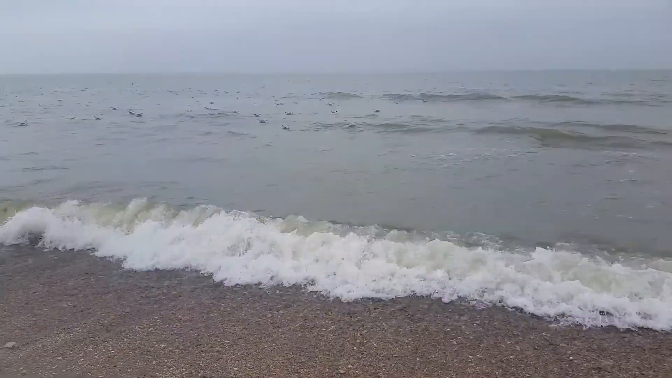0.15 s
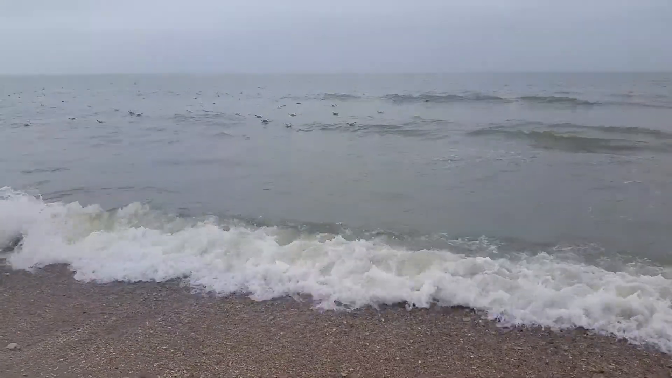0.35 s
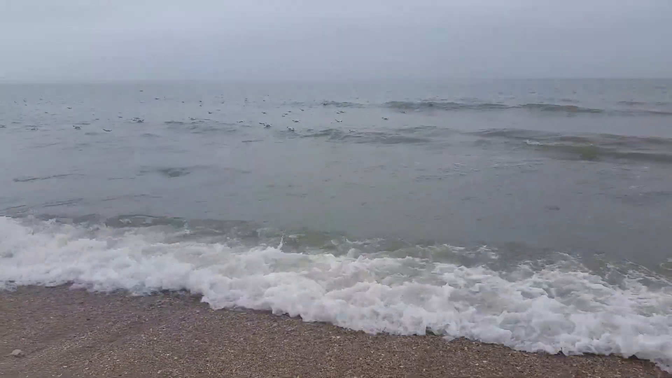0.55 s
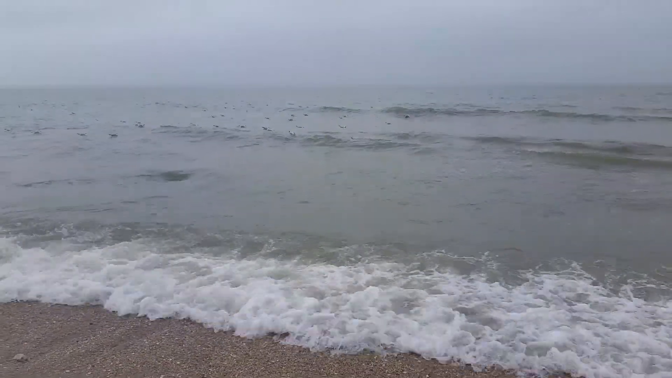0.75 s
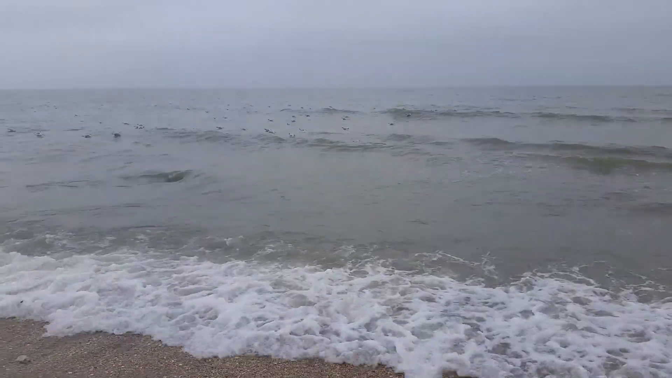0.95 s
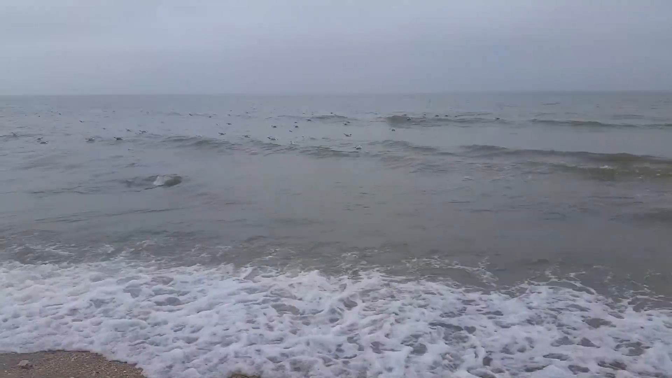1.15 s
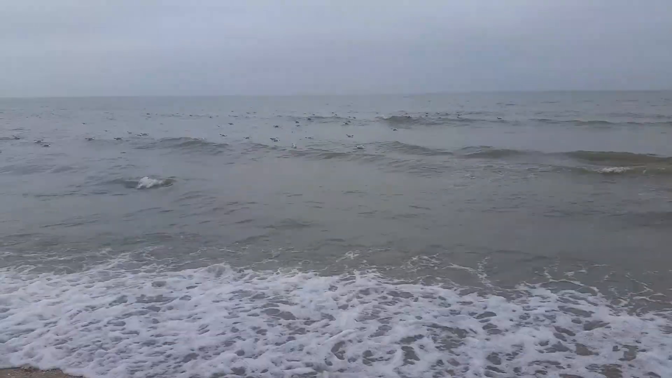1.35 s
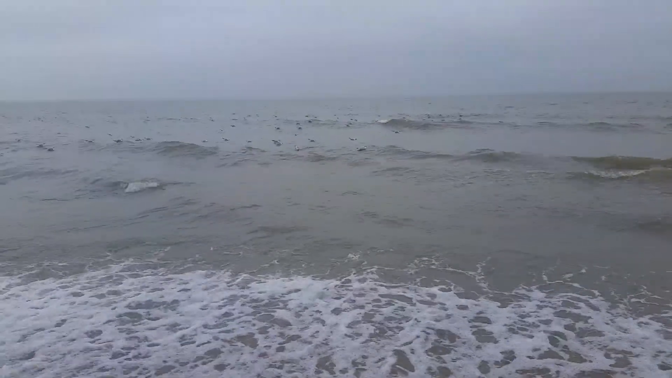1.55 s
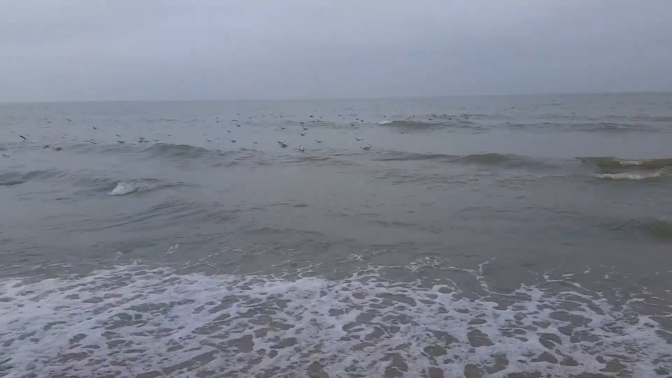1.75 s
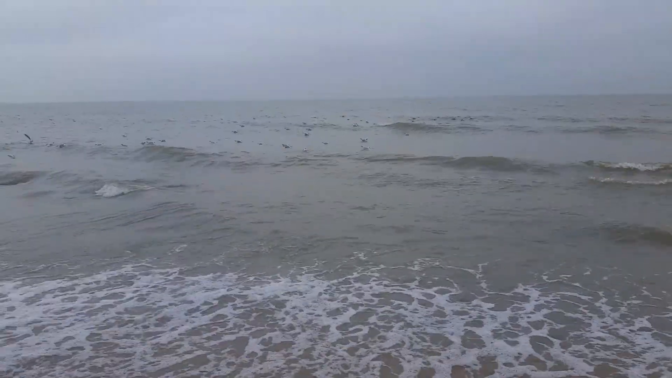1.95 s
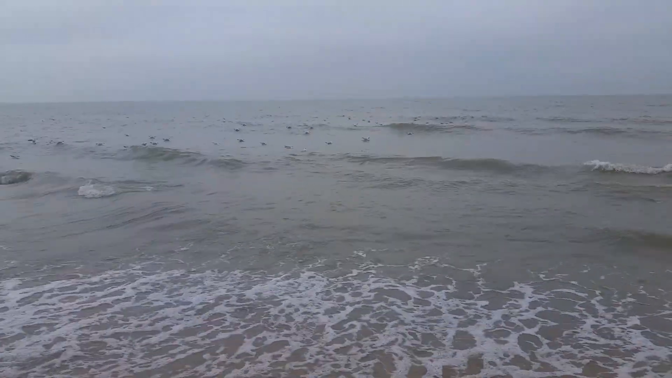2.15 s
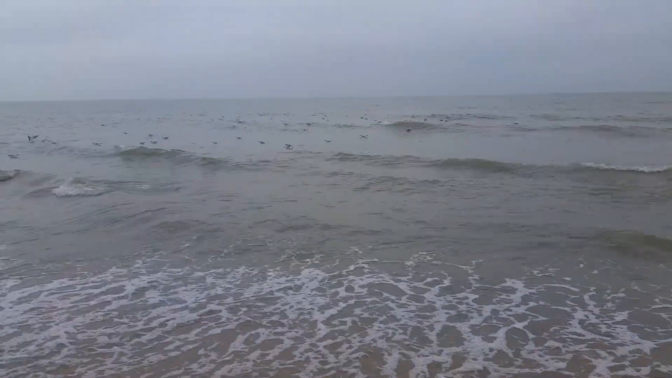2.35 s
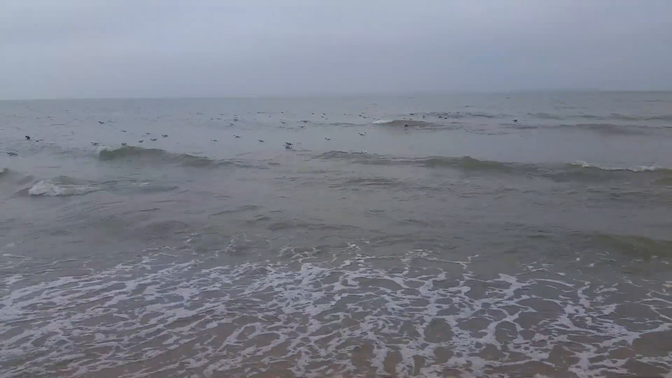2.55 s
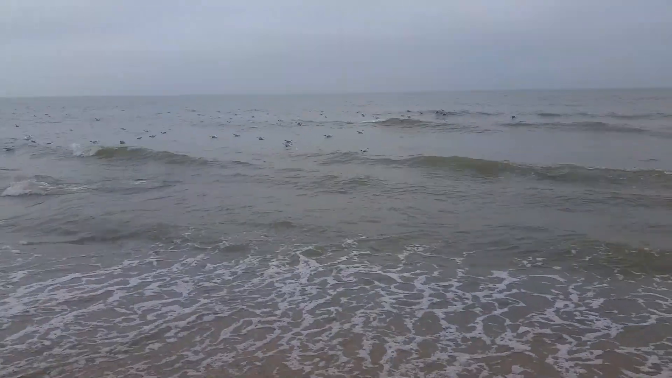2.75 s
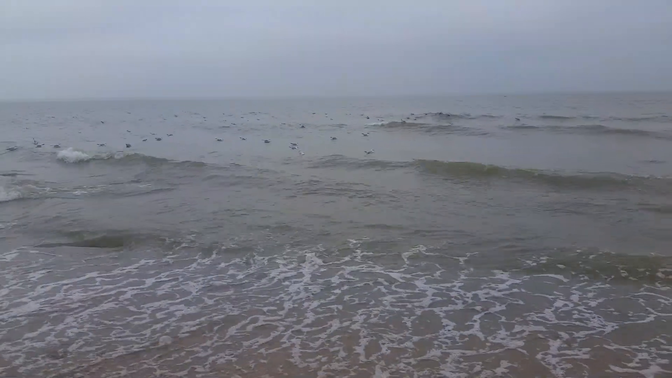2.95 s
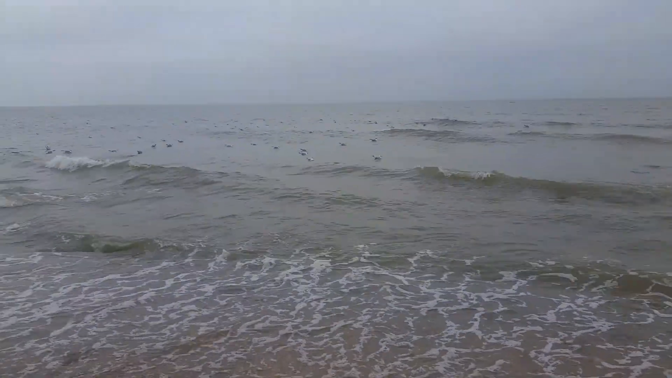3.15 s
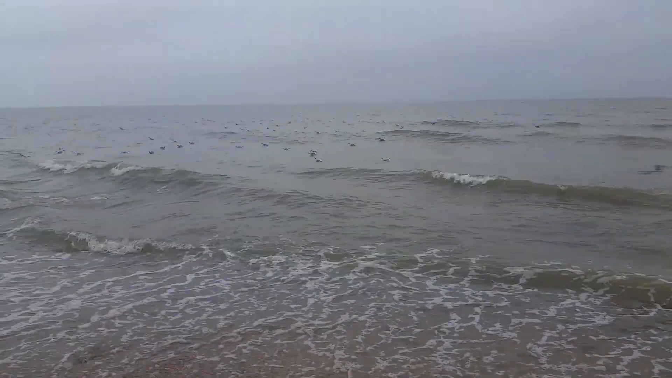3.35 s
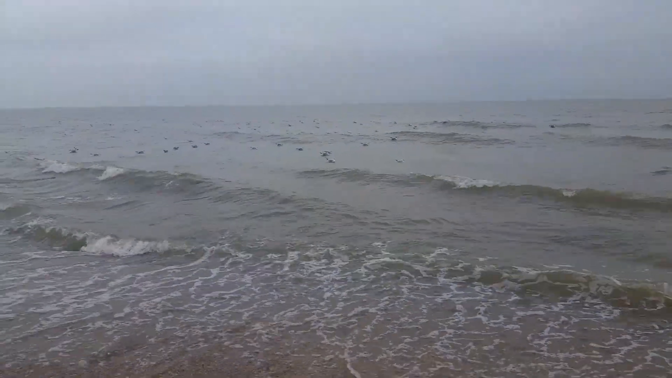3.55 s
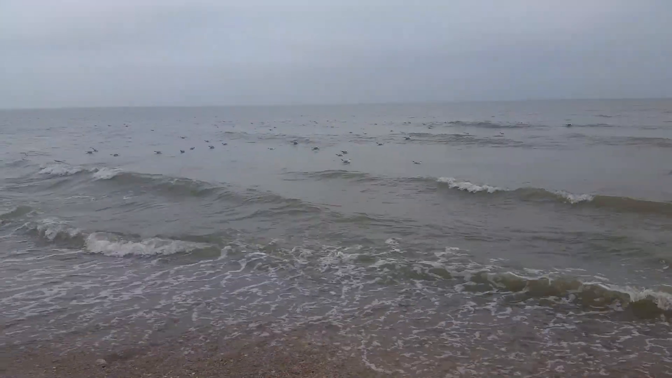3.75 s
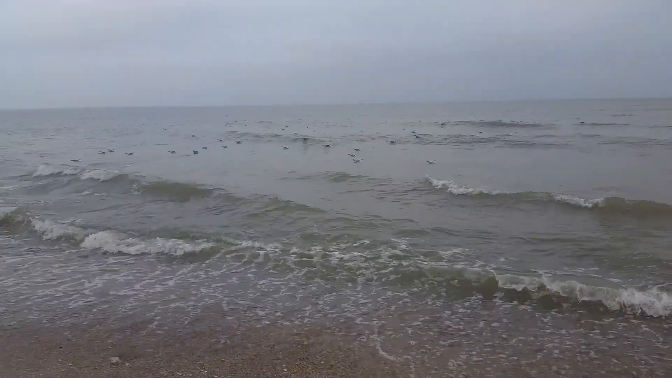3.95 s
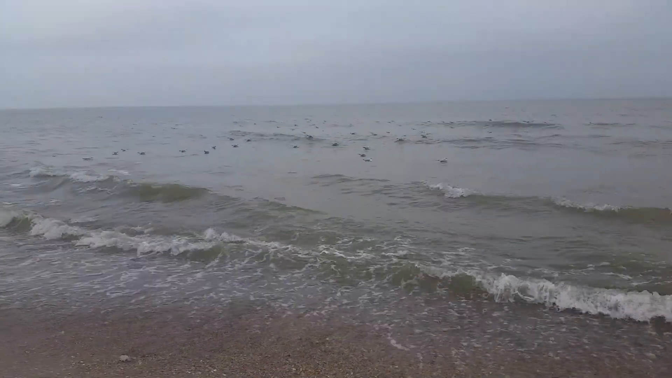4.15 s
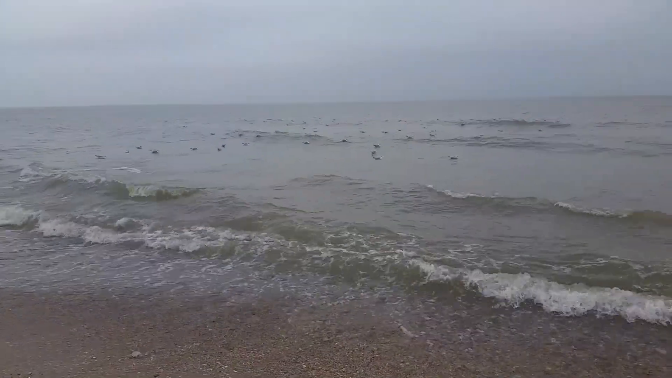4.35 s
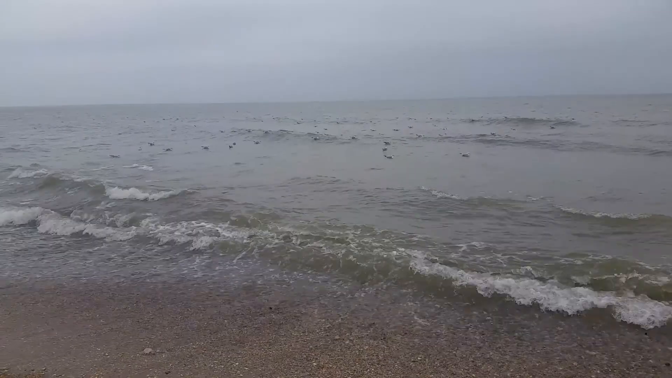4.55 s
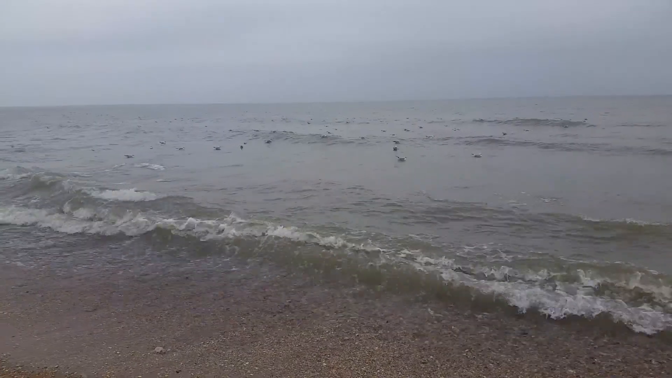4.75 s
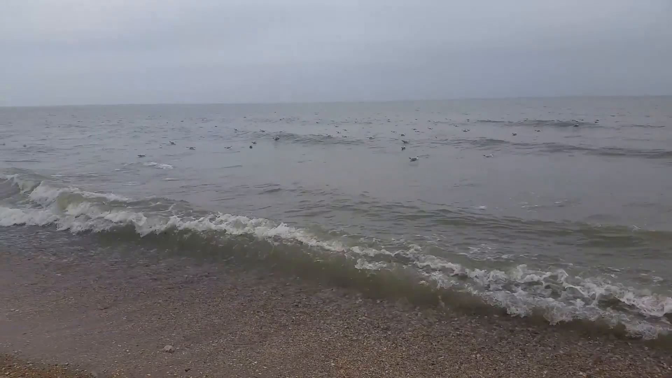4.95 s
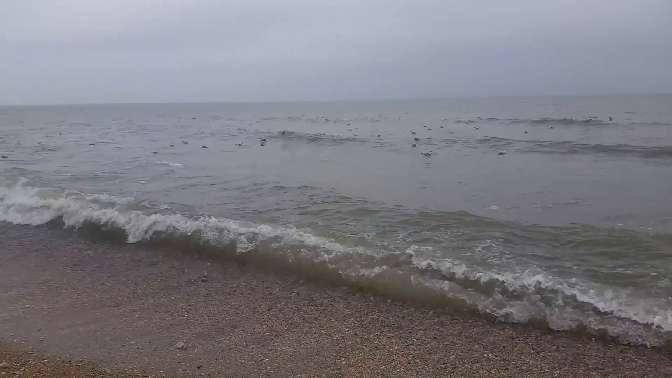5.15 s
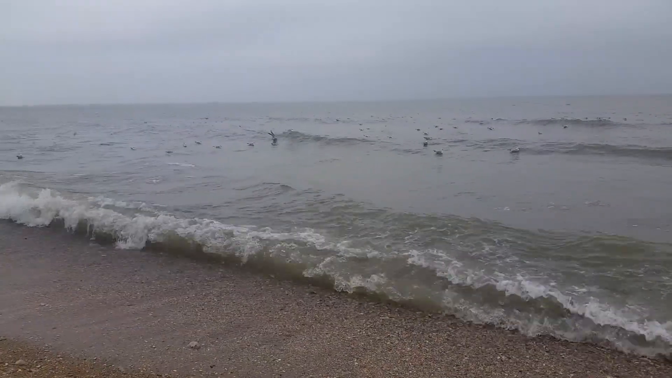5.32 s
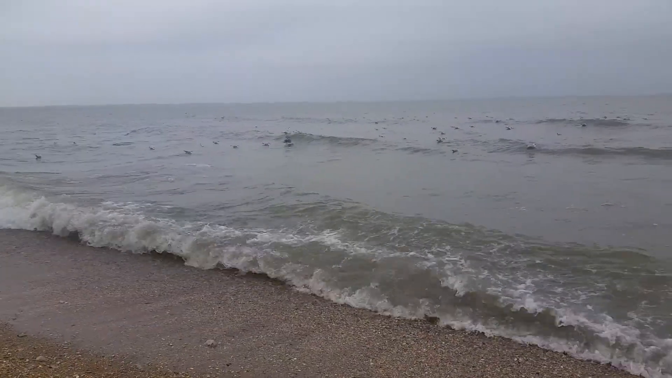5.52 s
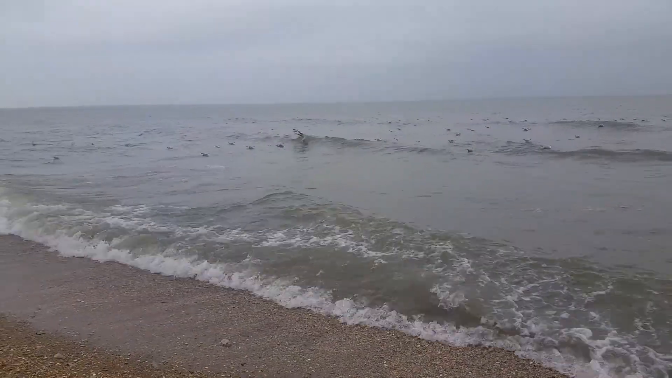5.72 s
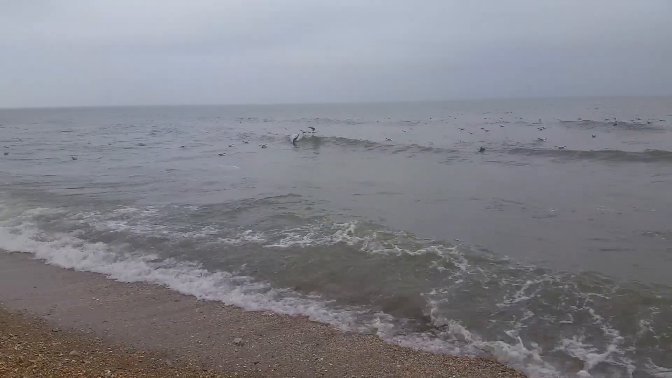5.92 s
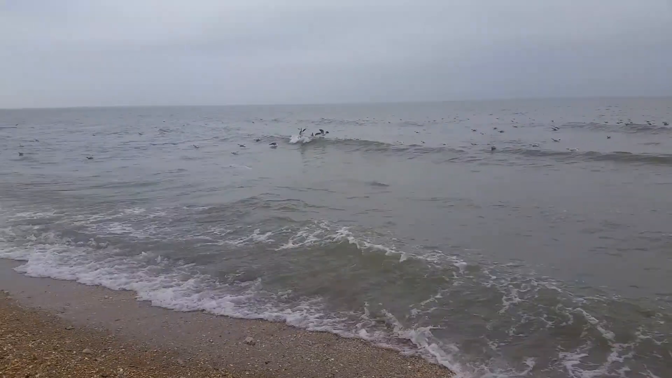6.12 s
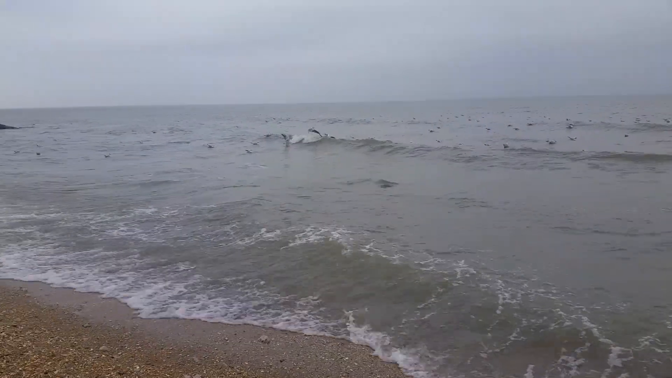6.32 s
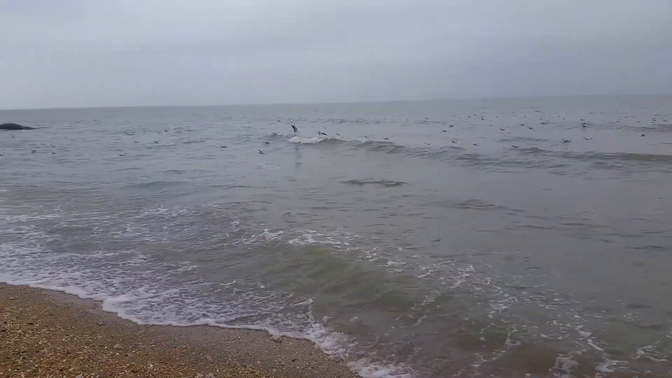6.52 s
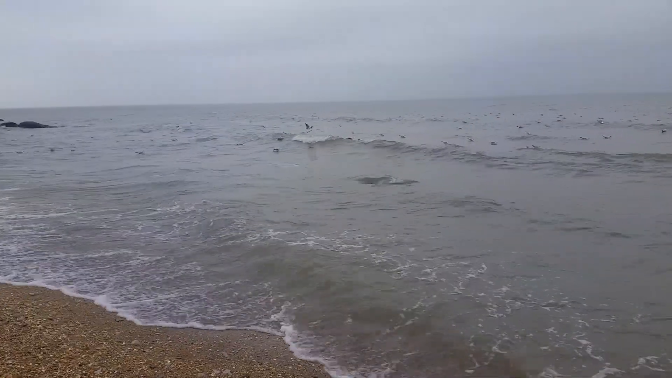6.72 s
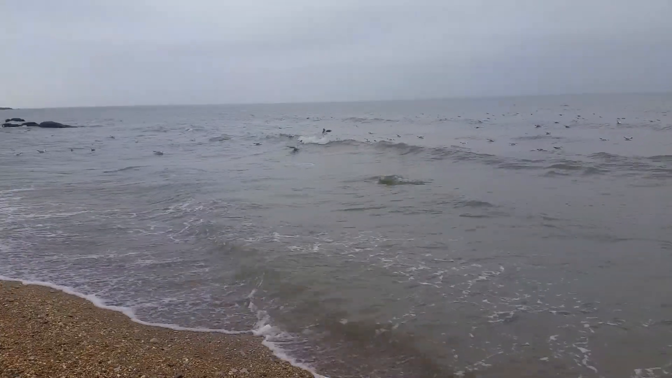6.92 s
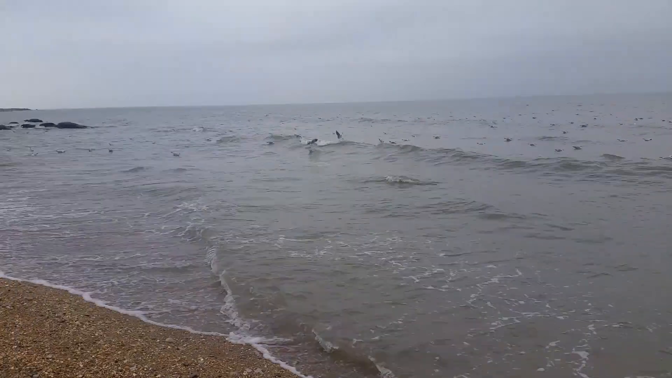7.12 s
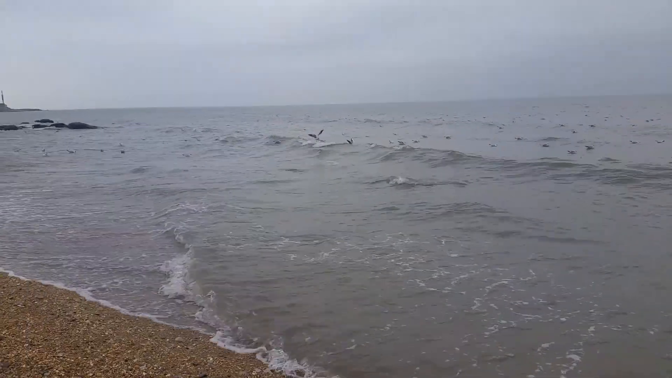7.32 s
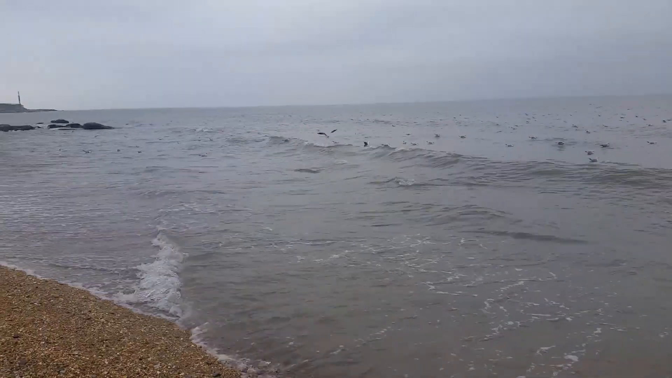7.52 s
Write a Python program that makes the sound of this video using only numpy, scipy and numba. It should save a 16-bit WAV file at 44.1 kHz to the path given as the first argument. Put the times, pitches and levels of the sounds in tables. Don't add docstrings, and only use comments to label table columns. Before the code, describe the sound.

A small wave is already crashing at the start, with roar, watery wash, shell rattle and fizzing foam, plus a few bubbly plops. It fades to a softer sea, then smaller surges build to another strong break. Wind thumps grow heavy late. Handheld stereo microphone a few metres away outdoors, right side brighter, left side duller.

```python
import sys
import numpy as np
from scipy import signal
from scipy.fft import rfft, irfft, next_fast_len
from scipy.io import wavfile
from scipy.ndimage import uniform_filter1d, minimum_filter1d
from numba import njit

SR = 44100
rng = np.random.default_rng(int(sys.argv[2]) if len(sys.argv) > 2 else 0)


def magnitude_from_level(level_db):
    exponent = np.asarray(level_db, float) / 20
    return 10 ** exponent


def master_out(mix):
    frames = np.transpose(np.atleast_2d(mix))
    ceiling = np.clip(frames, -1, 1)
    pcm = np.round(ceiling * 32767).astype(np.int16)
    wavfile.write(sys.argv[1], SR, pcm)


N = 334278
LAG_S = 0.00042


def noise():
    return rng.standard_normal(N)


def unit(x):
    return x / np.sqrt(np.mean(x ** 2))


def over_time(table):
    s, *columns = np.transpose(table)
    return np.array([np.interp(np.arange(N) / SR, s, c) for c in columns])


def over_hz(hz, points, values):
    return np.interp(np.log(hz), np.log(points), values)


def walk(rate):
    hold = int(SR / rate)
    held = np.repeat(rng.standard_normal(N // 64), hold)[:N]
    slewed = uniform_filter1d(held, hold)
    return unit(uniform_filter1d(slewed, hold))


@njit
def rings(start, hz, cycles, size, glide):
    out = np.zeros(N)
    for c, f, n, a in zip(start, hz, cycles, size):
        phase, step = 0., 2 * np.pi * f / SR
        length = int(n * SR / f)
        for i in range(min(length, N - int(c))):
            phase += step * (1 + glide * i / length)
            out[int(c) + i] += a * np.sin(phase) * np.exp(-5 * i / length)
    return out


@njit
def bumps(start, width, size):
    out = np.zeros(N)
    for c, w, a in zip(start, width, size):
        for i in range(max(0, int(c - 6 * w)), min(N, int(c + 6 * w))):
            out[i] += a / (1 + ((i - c) / w) ** 2) ** 2
    return out


def bubbles(per_s, low_hz, high_hz, cycles, scatter_db):
    when, pitch, luck = rng.random((40000, 3))[:int(per_s * N / SR)].T
    hz = low_hz * (high_hz / low_hz) ** pitch
    louder_db = scatter_db * np.minimum(-np.log(1 - luck), 4)
    return unit(rings(when * N, hz, cycles + 0 * hz, hz ** 1.6 * magnitude_from_level(louder_db), 0.3))


def water():
    clumps = magnitude_from_level(1.4 * walk(16)) * bubbles(1500, 307, 5240, cycles=7.5, scatter_db=1.8)
    foam = magnitude_from_level(2.4 * walk(9)) * bubbles(3500, 2840, 17100, cycles=3.7, scatter_db=3.2)
    return unit(noise() + magnitude_from_level(-13.0) * clumps + magnitude_from_level(-8.0) * foam)


def swell():
    # crest in seconds, strength in dB over the calm sea,
    # build-up in dB per second, extra plunge in dB, extra foam in dB.
    waves = [(0.12, 10.5, 8, -1, 0), (0.27, 6, 27, 5.5, -6), (0.52, 4.5, 28, -4, 2), (0.76, 4, 35, -6.5, 4),
             (1.7, -3, 21, 6, 0.5), (2.24, -4.5, 32, -1, -0.5), (2.95, -2, 11.5, -0.5, -3),
             (3.62, 2, 10, -4, -1.5), (3.92, -3, 33, -1.5, 0), (4.23, 3.5, 14, -4, 0.5),
             (4.5, 0, 28, -3.5, 1.5), (4.97, 6, 13.5, -5, 0), (5.34, 2.5, 11, -1.5, -0.5),
             (5.6, 3.5, 30, -5.5, 5), (5.74, 10.5, 21, -6.5, -0.5), (5.87, 4.5, 42, -1, -11),
             (6.09, 0, 42, -6, 4.5), (6.58, -4, 30, 2, 0), (6.83, 3, 16, 3, -7.5), (7.08, 2.5, 50, 2, -3.5),
             (7.37, 1, 40, -6.5, -1), (7.47, 2.5, 37, -2, 6.5)]
    far_db = np.array([-2.5, -6, -6.5, -6])
    ebb_db_s = np.array([[19], [20.5], [12.7], [17.1]])
    plunge_share = np.array([[0.92], [0.062], [0.35], [0.54]])
    foam_share = np.array([[0.0], [0.35], [0.55], [0.97]])
    power = np.ones((4, N)) * magnitude_from_level(2 * far_db)[:, None]
    for s, db, rise_db_s, plunge_db, foam_db in waves:
        late = np.arange(N) / SR - s
        crest_db = db + plunge_share * plunge_db + foam_share * foam_db
        slope_db = np.minimum(rise_db_s * late, -ebb_db_s * late)
        power = power + magnitude_from_level(2 * (crest_db + slope_db))
    return 10 * np.log10(power)


def surf():
    layer_hz = (330, 800, 4400, 10500)
    # frequency in Hz, level in dB per Hz.
    left_port = [(40, -8), (100, -0.5), (330, -3), (480, -10), (1000, -18.5), (2400, -25.5), (3650, -36),
                 (4450, -25), (5100, -31), (5600, -43), (7200, -56), (9600, -60), (12000, -55),
                 (16000, -58)]
    # frequency in Hz, level in dB per Hz.
    right_port = [(40, -6), (220, 5), (350, 1), (480, -5.5), (1000, -8), (2300, -12.5), (3000, -21.5),
                  (3650, -25.5), (4900, -22.5), (6400, -34.5), (9500, -36.5), (11300, -21.5),
                  (13000, -10.5), (16000, -13)]
    # frequency in Hz, likeness of the two ports from 0 to 1.
    likeness = [(100, 0.87), (340, 0.94), (600, 0.79), (900, 0), (1400, 0.48), (2400, 0.58), (4000, 0)]
    # frequency in Hz, left share,
    # right share.
    follow = [(320, 1, 0.99), (670, 1, 1.24), (1290, 0.99, 1.084), (2370, 0.79, 0.69), (4600, 0.15, 1.25),
              (9000, 1, 1.48), (13100, 0.24, 0.95)]
    lead_rad = 0.34
    size = next_fast_len(N)
    hz = np.maximum(np.arange(size // 2 + 1) * SR / size, 1)
    left, right = (magnitude_from_level(over_hz(hz, *np.transpose(port))) for port in (left_port, right_port))

    near, other = rfft(water(), size), rfft(water(), size)
    alike = np.clip(over_hz(hz, *np.transpose(likeness)), 0, 1)
    delay = np.exp(1j * (lead_rad - 2 * np.pi * hz * LAG_S))
    shaded = alike * near * delay + np.sqrt(1 - alike ** 2) * other
    per_hz = np.sqrt(SR / 2) * magnitude_from_level(-60.5)
    ports = per_hz * np.array([shaded * left, near * right])

    swell_db = swell()
    follow_hz, *shares = np.transpose(follow)
    sway = [walk(8.1) for _ in range(6)]
    out = np.zeros((2, N))
    for k, centre in enumerate(2 ** np.arange(5, 14.4, .5)):
        slice_ = np.cos(np.pi / 2 * np.clip(2 * np.log2(hz / centre), -1, 1)) ** 2
        weights = [over_hz(centre, layer_hz, row) for row in np.eye(4)]
        slice_db = weights @ swell_db
        flicker_db = 0.15 * sway[k // 4] + 0.74 * walk(18)
        share = np.array([[over_hz(centre, follow_hz, c)] for c in shares])
        out += magnitude_from_level(share * slice_db + flicker_db) * irfft(ports * slice_, size)[:, :N]
    return out


def plops():
    # start in seconds, peak in dB, pitch in Hz.
    large_bubbles = [(0.022, -24, 1190), (0.076, -24, 926), (0.185, -23, 647), (0.234, -27, 622),
                     (0.304, -28, 615), (0.459, -25, 610), (0.649, -30, 715), (5.141, -26, 810),
                     (5.321, -30, 730), (5.437, -28, 1050), (5.689, -18, 1030), (5.741, -21, 1030),
                     (6.933, -23, 605), (7.362, -27, 780)]
    s, db, hz = np.transpose(large_bubbles)
    ring = rings(s * SR, 1. * hz, 14 + 0 * s, magnitude_from_level(db), 0.17)
    return np.array([magnitude_from_level(-3) * np.roll(ring, int(LAG_S * SR)), magnitude_from_level(8.0) * ring])


def capsule(pressure, hz, sharpness):
    w = 2 * np.pi * hz
    return signal.lfilter(*signal.bilinear([1, 0, 0], [1, w / sharpness, w * w], SR), pressure)


def gusts(level_db, eddies, port):
    # corner in Hz, sharpness.
    lone_cut = [(40, 0.5), (52, 0.55)]
    # corner in Hz, sharpness.
    train_cut = [(65, 0.87), (85, 1)]
    when, breadth, side, luck = rng.random((4000, 4))[:int(260 * N / SR)].T
    width_ms = 1.41 * 3.15 ** breadth
    louder_db = 2.6 * np.minimum(-np.log(1 - luck), 4)
    size = np.sign(side - .5) * magnitude_from_level(louder_db) * width_ms ** 0.83
    train = bumps(when * N, width_ms * SR / 1000, size)
    tumble = unit(capsule(train, *train_cut[port]))

    s, peak_db, wide_ms, sign = np.transpose(eddies)
    at = (s + 0.00029) * SR
    wide = 0.75 * wide_ms * SR / 1000
    push = np.sign(sign) * magnitude_from_level(peak_db + 6.5)
    lone = bumps(at, wide, push) - 0.37 * bumps(at - 1.88 * wide, wide, push)
    swept = np.clip(1 - 1.1 * bumps(at, 2.3 * wide, 1 + 0 * s), 0, 1)
    gusty = magnitude_from_level(level_db - 1.7 + 3.0 * walk(14))
    return swept * tumble * gusty + capsule(lone, *lone_cut[port])


def wind():
    # time in seconds, left level in dB, right level in dB.
    turbulence = [(0.0, -31, -18), (0.14, -43, -19.5), (0.3, -51, -47), (0.95, -42, -33.5),
                  (2.1, -38.5, -36.5), (2.5, -38.5, -39.5), (3.5, -54, -46), (4.1, -37, -46),
                  (4.42, -38.5, -50), (4.6, -26.5, -28.5), (5.0, -30.5, -24.5), (5.57, -14.5, -21),
                  (5.75, -20, -25), (6.2, -20, -23), (6.7, -18, -23.5), (6.95, -10.5, -15),
                  (7.3, -15, -22.5), (7.58, -28.5, -25)]
    # time in seconds, peak in dB, width in ms, push (+1) or suck (-1).
    left_eddies = [(0.0765, -12.9, 2.2, 1), (0.102, -21, 2.7, -1), (0.5893, -13.5, 5, -1),
                   (0.6846, -8, 3.6, -1), (1.1359, -9, 2.8, -1), (2.0948, -9.5, 5.2, -1),
                   (4.2524, -18, 1.5, 1), (4.5608, -13.5, 2.6, 1), (4.6205, -9, 3.9, 1),
                   (5.0917, -10, 4.4, 1), (5.193, -9.5, 3.3, 1), (5.4297, -6, 3, -1),
                   (5.5565, -3.5, 4.8, 1), (5.6024, -5.7, 2.6, -1), (5.63, -7, 3.3, 1), (5.98, -8.5, 4, 1),
                   (6.0222, -10.5, 3.1, 1), (6.0972, -5, 3.6, 1), (6.234, -9.5, 2.7, 1),
                   (6.2687, -8, 4.4, -1), (6.4003, -7.8, 3.2, 1), (6.695, -3.5, 2.6, 1), (6.787, 0, 2.6, 1),
                   (6.9368, 1, 2.1, 1), (6.994, -5, 2.4, 1), (7.023, -1.5, 1.8, -1), (7.0816, 0.5, 2, 1),
                   (7.2087, -6, 5.1, 1), (7.232, -0.5, 5.8, -1), (7.2527, -7, 2, -1)]
    # time in seconds, peak in dB, width in ms, push (+1) or suck (-1).
    right_eddies = [(0.0457, -22, 1.8, 1), (0.2367, -10, 0.63, 1), (0.497, -19, 1.2, -1),
                    (1.266, -14.5, 2.7, 1), (1.3654, -13.5, 3.4, 1), (2.08, -29, 2.3, 1),
                    (2.825, -24, 1.8, -1), (3.0137, -22, 1.6, 1), (3.6573, -21, 0.96, -1),
                    (3.9995, -21.8, 0.98, 1), (4.106, -18.5, 1.3, -1), (4.14, -20.5, 0.92, 1),
                    (4.921, -16.5, 3.6, -1), (4.937, -13, 2.3, 1), (5.1622, -11, 3.4, -1),
                    (5.187, -12.5, 4.1, 1), (5.365, -6, 3.2, 1), (5.4236, -8, 4.3, -1), (5.594, -6, 3.4, 1),
                    (6.2619, -13, 2.2, 1), (6.434, -10, 3.8, -1), (6.462, -8, 5, -1), (6.6121, -9, 2.6, 1),
                    (6.6326, -12, 2.7, -1), (6.792, -6.5, 3.3, 1), (6.837, -9, 2.6, -1),
                    (6.8935, -9, 1.8, -1), (7.373, -11, 5.3, 1), (7.4595, -6.5, 4.3, -1),
                    (7.4819, -4, 3.9, -1)]
    left_db, right_db = over_time(turbulence)
    return np.array([gusts(left_db, left_eddies, port=0), gusts(right_db, right_eddies, port=1)])


def spray():
    # time in seconds, peak in dB.
    drops = [
        (6.852, -32),
        (7.0645, -10),
        (7.341, -26),
        (7.37, -24),
        (7.398, -27),
    ]
    s, db = np.transpose(drops)
    turn, one = 2 * np.pi * np.arange(N) / SR, np.ones(len(s))
    whistle = bumps(s * SR, 0.00026 * SR * one, magnitude_from_level(db)) * np.sin(13300 * turn)
    click = bumps((s - .0017) * SR, 0.0003 * SR * one, magnitude_from_level(db - 13)) * np.sin(5200 * turn)
    return np.array([0 * click, whistle + click])


def whine():
    return magnitude_from_level(-75) * np.sin(2 * np.pi * 15000 * np.arange(N) / SR)


def scene():
    return surf() + plops() + wind() + spray() + whine()


def roll_off(x):
    return signal.sosfilt(signal.butter(12, 16040, fs=SR, output="sos"), x)


def record(dry):
    limit_db, attack_s, release_s = -6, 0.0056, 0.036
    rumble_cut_hz, top_hz = 29, 15750
    peak_db = 20 * np.log10(np.abs(dry).max(axis=0) + 1e-9)
    over_db = np.minimum(limit_db - peak_db, 0)
    hold, fade = int(attack_s * SR), np.exp(-1 / (release_s * SR))
    duck_db = uniform_filter1d(minimum_filter1d(over_db, 2 * hold), hold)
    duck_db = np.minimum(duck_db, signal.lfilter([1 - fade], [1, -fade], duck_db))
    size = next_fast_len(N)
    hz = np.arange(size // 2 + 1) * SR / size
    passed = (hz < top_hz) * 1j * hz / (rumble_cut_hz + 1j * hz)
    tones = rfft(dry * magnitude_from_level(0.49 * duck_db), size) * passed
    return roll_off(irfft(tones, size)[:, :N])


dry = scene()
out = record(dry)
master_out(out)
```